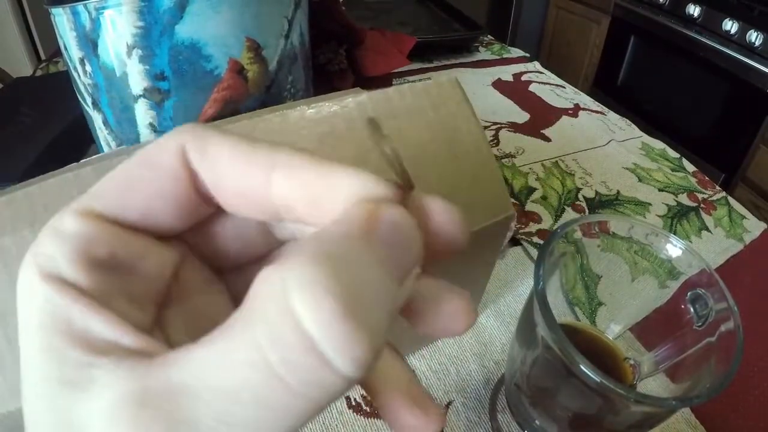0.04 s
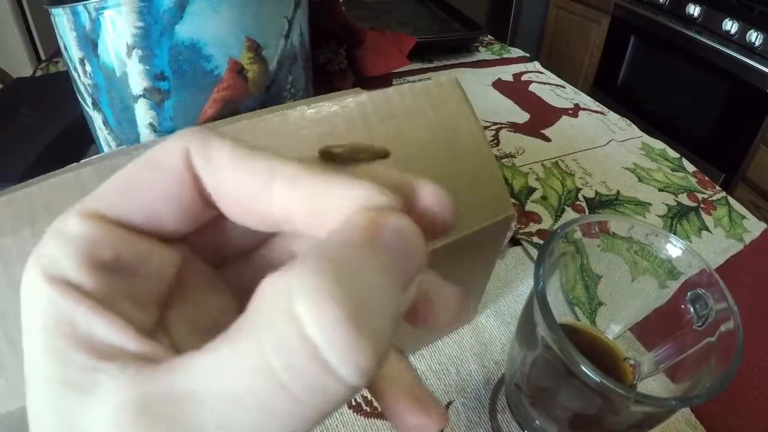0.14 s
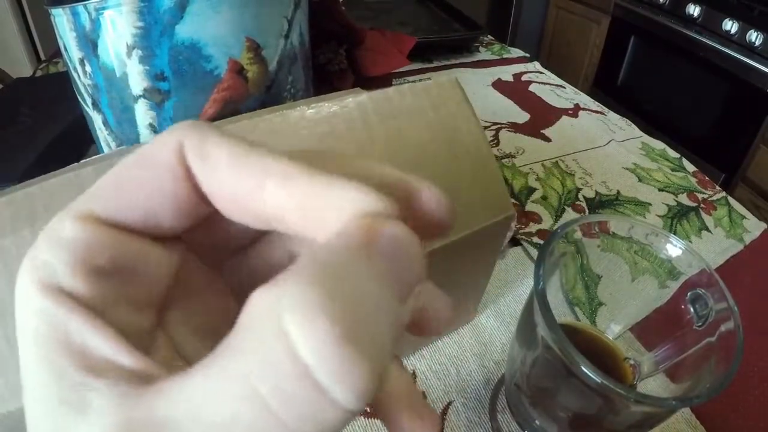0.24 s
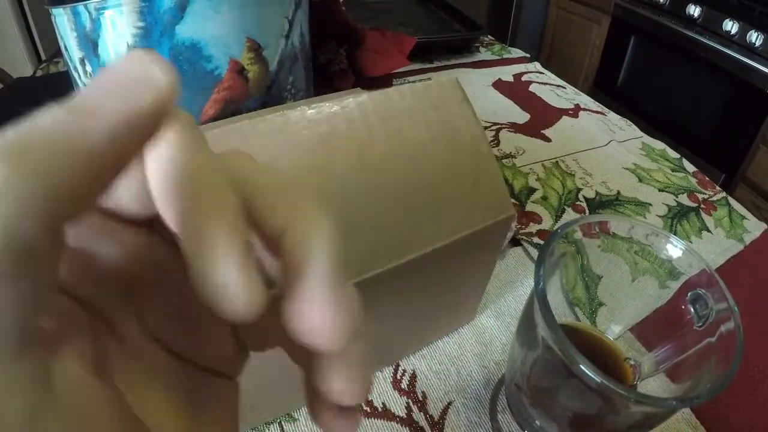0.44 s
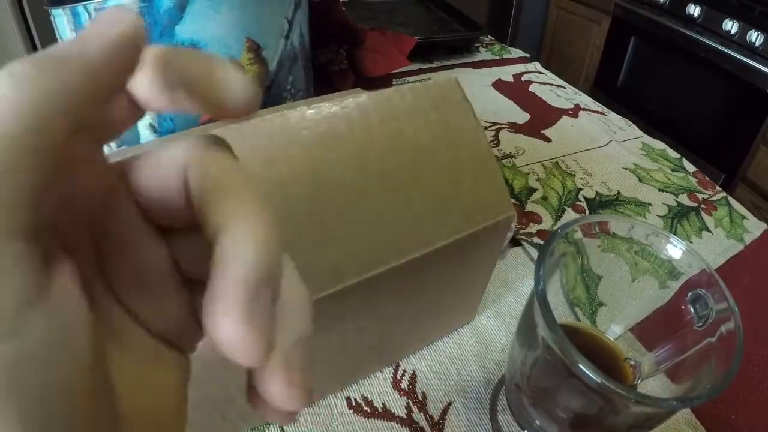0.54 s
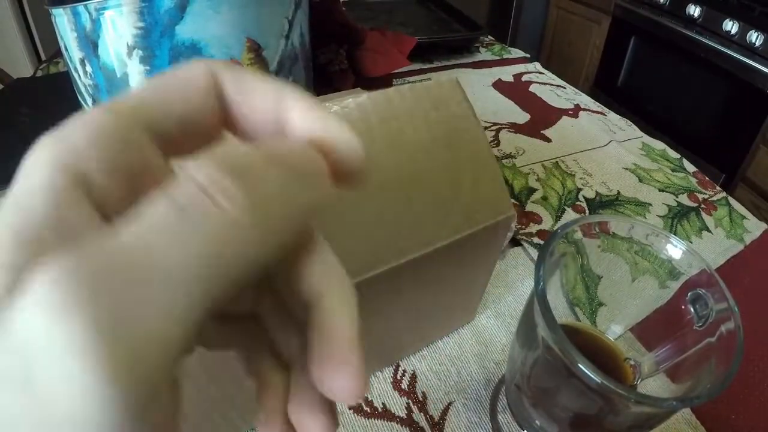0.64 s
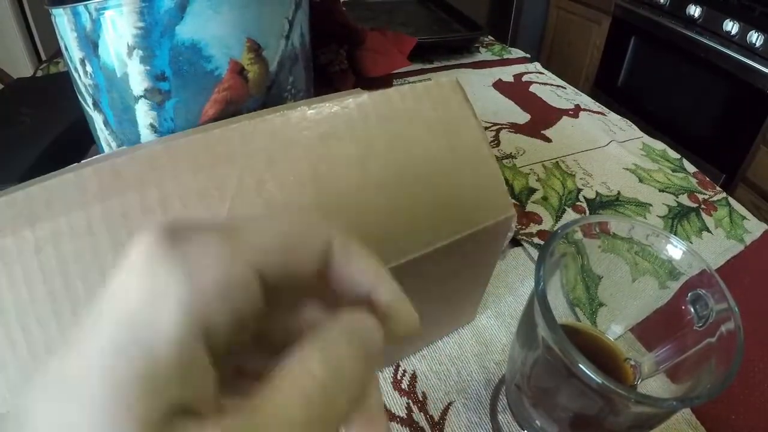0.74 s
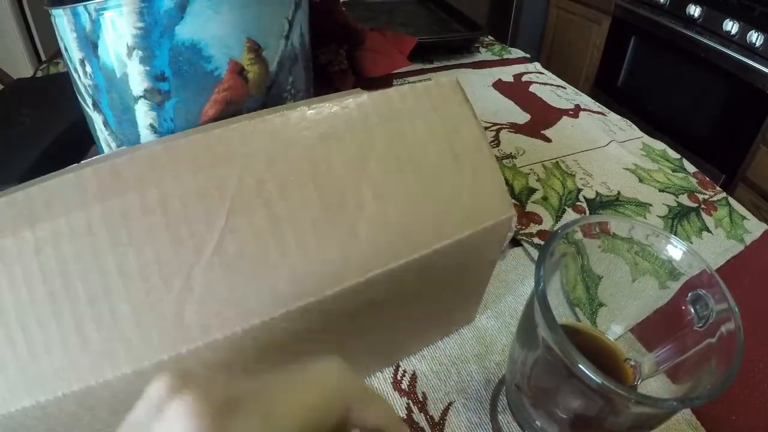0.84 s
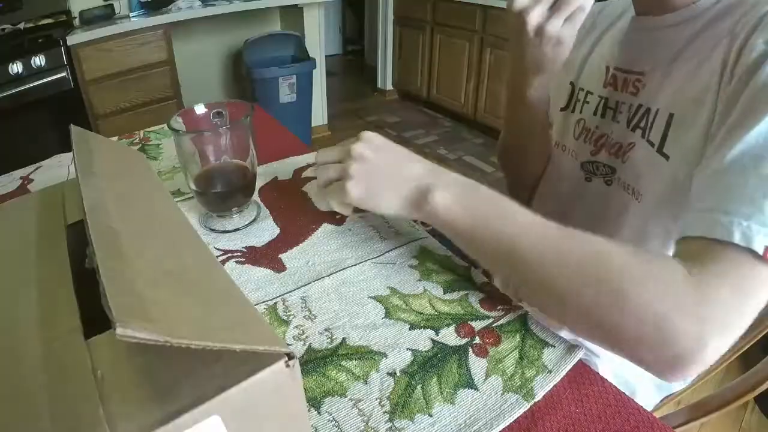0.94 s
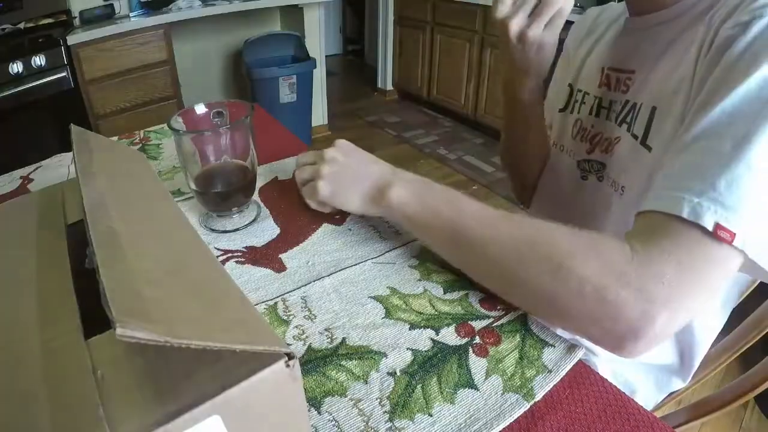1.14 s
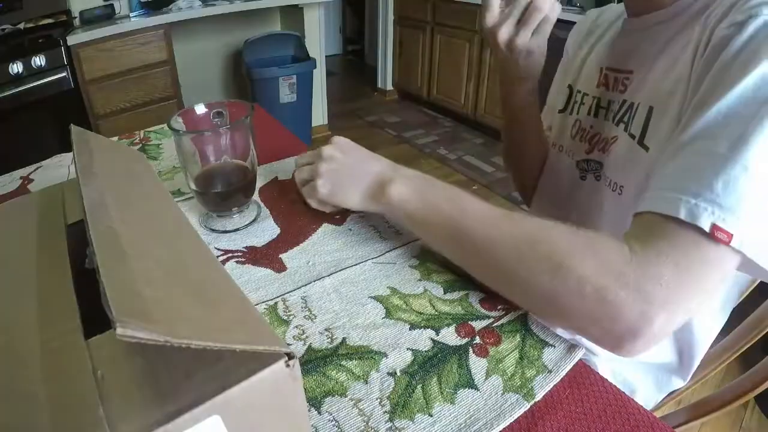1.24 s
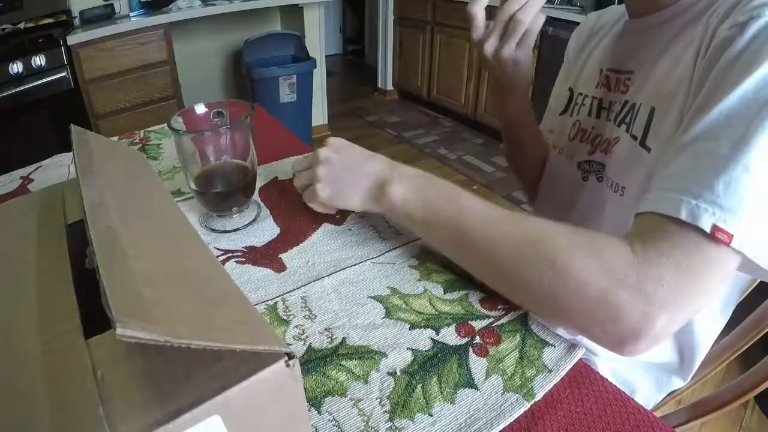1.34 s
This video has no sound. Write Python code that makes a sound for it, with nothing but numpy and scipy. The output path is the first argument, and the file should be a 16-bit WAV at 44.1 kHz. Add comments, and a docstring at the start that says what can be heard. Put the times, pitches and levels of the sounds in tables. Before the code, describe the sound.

A single sharp finger snap cracks close to the microphone at about 0.25 seconds, with a short kitchen echo. From 0.35 to 0.75 seconds the microphone is jostled, giving low booming bumps. A coin ticks further off near 0.5 seconds and clinks faintly around 0.75. At 0.8 seconds the sound drops out under a short low buzz, and quieter room tone returns just before 1 second.

```python
"""A finger snap flicks a coin away in a kitchen, close to a camera's stereo microphone: the fingers
slip, crack and thump the palm, and the room answers. Further off the coin ticks, then clinks faintly.
The camera is jostled and its housing booms, opposite in the two channels.
The sound then drops out with a short low buzz and returns as quieter room tone."""
import sys
import numpy as np
from scipy import signal
from scipy.fft import rfft, irfft, next_fast_len
from scipy.io import wavfile

SR = 44100
rng = np.random.default_rng(int(sys.argv[2]) if len(sys.argv) > 2 else 0)


def file_out(sig):
    """Save sig as 16-bit WAV at sys.argv[1]."""
    # one column per channel
    cols = np.atleast_2d(sig).T
    # limit, then scale
    lim = np.clip(cols, -1, 1)
    pcm = np.round(lim * 32767).astype(np.int16)
    wavfile.write(sys.argv[1], SR, pcm)


N = 61739

# Room tone before and after the dropout. Each row: frequency in Hz, relative level in dB.
TONE_BEFORE = [(47, -29.5), (85, -0.5), (380, -14), (731, -23.5), (1350, -25.5), (5130, -37.5),
               (6820, -33.5), (12000, -41), (15000, -57.5)]
TONE_AFTER = [(15, -29), (25, -2.5), (88, -3.5), (243, -15), (383, -22.5), (1600, -35.5), (3450, -50.5),
              (5600, -47.5), (7300, -50.5), (9000, -47.5), (12000, -58.5)]
# Stereo image of room tone and reverberation. Each row: frequency in Hz, left-right correlation.
TONE_LIKENESS = [(50, 1), (300, 0.99), (1500, 0.12)]
REVERB_LIKENESS = [(120, 0.15), (280, 0.53), (1200, 0.15), (6000, 0.61)]
# The kitchen's decay. Each row: frequency in Hz, time to fall 60 dB in seconds.
REVERB_T60 = [(200, 0.57), (1200, 0.45), (6000, 0.29)]
# The kitchen's answer to snap and coin. Each row: frequency in Hz, relative level in dB.
SNAP_REVERB = [(53, -48.5), (90, -12), (226, -5), (362, -13.5), (520, -9), (800, -16), (1390, -18),
               (1960, -33.5), (2820, -26), (3570, -39), (5720, -32.5), (10200, -52), (15000, -99)]
TICK_REVERB = [(1400, 7.5), (3000, -17), (6300, 1.5), (9000, -18), (15000, -25)]
# Outline of the buzz's harmonics. Each row: frequency in Hz, relative level in dB.
BUZZ_SPECTRUM = [(120, 5.5), (240, 0.5), (480, -17), (700, -31.5), (1500, -32.5), (3550, -64), (3820, -42),
                 (4000, -41), (4250, -71), (6650, -44), (7200, -65)]
# Rumble of movement. Each row: time in seconds, level in dB.
RUMBLE_LEVELS = [(0.0, -49.5), (0.706, -36), (0.86, -40.5)]
# Handling noises at the microphone. Each row: frequency in Hz, relative level in dB.
RUMBLE_SPECTRUM = [(15, -3), (35, 5.5), (70, 0), (400, -60)]
GRIP_SPECTRUM = [(250, -32), (800, 2.5), (2000, -19.5), (12000, -48)]
BRUSH_SPECTRUM = [(530, -48), (900, 0), (2650, -8.5), (6270, -4.5), (14000, -34)]
SCUFF_SPECTRUM = [(320, -23), (500, 18), (740, 3.5), (1400, -42)]
SCRAPE_SPECTRUM = [(900, 0), (1150, 6), (1550, -10.5), (2100, -8), (3200, -36), (14000, -49)]
# Bumps on the camera. Each row: start in seconds, boom, knock, scuff and scrape in dB, contact in seconds.
CAMERA_BUMPS = [(0.347, -4, -10, -21.5, -38.5, 0.01384), (0.434, -16.5, -29.5, -27, -37, 0.012),
                (.467, -10.5, -25, -30.5, -34.5, 0.0065), (.530, -31, -37.5, -39, -35.5, 0.0083),
                (.579, -17, -37.5, -33, -36, .012), (0.642, -53, -36, -24.5, -35.5, 0.0051),
                (.659, -15, -33.5, -24.5, -38, 0.0138), (.736, -24, -45, -33, -38, 0.0074)]
# Low and upper housing modes. Each row: frequency in Hz, gain in dB, T60 in seconds, left over right in dB.
BOOM_MODES = [(114.6, -8, 0.4, -6.5), (145.2, -4, 0.39, -4), (186.1, -3.5, 0.46, -5),
              (195.4, 0, 0.19, -4.5)]
KNOCK_MODES = [(441, -1.5, 0.3, 8.5), (457.2, -0.5, 0.12, 10), (508, -5, 0.31, 4), (676, 18.5, 0.017, 1.5),
               (744, -8, 0.14, 3)]
# The coin's ring on landing. Each row: frequency in Hz, level in dB, T60 in seconds.
TICK_MODES = [(870, -31.5, 0.015), (4860, -36, 0.017), (5770, -25.5, 0.0053), (6290, -15, 0.0043)]
# Clinks after the landing. Each row: start in seconds, gain in dB.
CLINK_HITS = [(.7405, -46.5), (.812, -48.5)]
# Their rough resonances. Each row: centre in Hz, width in Hz, gain in dB.
CLINK_BANDS = [(3066, 170, -2), (6530, 420, -6.5)]
# Fingertip slips before the snap. Each row: start in seconds, level in dB, length in seconds.
FINGER_SLIPS = [(0.2145, -37.5, .0115), (0.2275, -25, 0.015)]
# The crack's three contacts. Each row: lag in seconds, gain in dB, left over right in dB.
CRACK_CONTACTS = [(0, 2, 2.5), (.00095, -9.5, 0.5), (.0017, -15, -15.5)]
# Sliding skin, finger crack and hollow of the palm. Each row: frequency in Hz, relative level in dB.
SLIP_SPECTRUM = [(100, -20.5), (400, -0.5), (750, -7), (1150, 6), (2000, -16.5), (3200, -30.5), (5500, -24),
                 (14000, -49)]
CRACK_SPECTRUM = [(300, -21), (880, -14), (1080, -1), (1380, -0.5), (1600, -1.5), (1900, -19), (2450, -24),
                  (3050, -11.5), (3700, -27.5), (4600, -19), (6000, -20), (7200, -25), (8500, -43),
                  (15000, -44.5)]
PALM_SPECTRUM = [(50, -33.5), (170, -9.5), (250, 1), (420, -5), (620, -14), (800, -18.5), (3000, -67.5)]


def amp(db):
    """Decibels to gain."""
    return 10 ** (np.asarray(db) / 20)


def unit(x):
    """Scale to rms 1."""
    return x / np.sqrt(np.mean(x ** 2) + 1e-20)


def along(points, hz):
    """Read (Hz, value) points on a log frequency axis."""
    freqs, values = np.transpose(points)
    return np.interp(np.log(hz + 1), np.log(freqs + 1), values)


def since(s):
    """Seconds since s, zero before."""
    return np.maximum(np.arange(N) / SR - s, 0)


def strike(s, rise, t60):
    """An envelope that rises at s and falls 60 dB every t60 seconds."""
    t = since(s)
    return (1 - np.exp(-t / rise)) * amp(-60 * t / t60)


def filtered(x, response):
    """x through a frequency response."""
    size = next_fast_len(N + SR // 2)
    return irfft(rfft(x, size) * response(np.fft.rfftfreq(size, 1 / SR)), size)[..., :N]


def delayed(x, s):
    """x arriving s seconds later."""
    return filtered(x, lambda hz: np.exp(-2j * np.pi * hz * s))


def noise(spectrum, likeness):
    """Shaped stereo noise of rms 1; likeness gives the left-right correlation by frequency."""
    def mid_side(hz):
        angle = np.arccos(np.clip(along(likeness, hz), -1, 1)) / 2
        return amp(along(spectrum, hz)) * [np.cos(angle), np.sin(angle)]
    mid, side = filtered(rng.standard_normal((2, N)), mid_side)
    return unit(np.array([mid + side, mid - side]))


def band(centre_hz, width_hz):
    """A narrow band of stereo noise of rms 1."""
    white = rng.standard_normal((2, N))
    return unit(filtered(white, lambda hz: np.exp(-((hz - centre_hz) / width_hz) ** 2)))


def ring(modes, s, rise):
    """Damped modes struck at s."""
    return sum(amp(db) * strike(s, rise, t60) * np.sin(2 * np.pi * hz * since(s))
               for hz, db, t60 in modes)


def click(spectrum, s):
    """One impulse at s, ringing out through a minimum-phase filter."""
    size = next_fast_len(2 * N)
    cepstrum = irfft(np.log(amp(along(spectrum, np.fft.rfftfreq(size, 1 / SR)))), size)
    cepstrum[1:size // 2] *= 2
    cepstrum[size // 2 + 1:] = 0
    response = irfft(np.exp(rfft(cepstrum)), size)
    return np.pad(response, (round(s * SR), 0))[:N]


def room_tone():
    """The kitchen's steady background, with a faint, thin band of hiss."""
    return amp(-47) * noise(TONE_BEFORE, TONE_LIKENESS) + amp(-70.5) * band(6830, width_hz=130)


def returning_tone(start_s=0.95, swell_db_per_s=12.5):
    """Quieter room tone comes in after the dropout and slowly swells."""
    t = since(start_s)
    onset = 1 - np.exp(-t / 0.0033)
    return amp(-51 + swell_db_per_s * t) * onset * noise(TONE_AFTER, TONE_LIKENESS)


def reverb(s, spectrum, rise_s=0.0024):
    """The kitchen answers a click at s; the treble dies first."""
    hz, t, frames = signal.stft(noise(spectrum, REVERB_LIKENESS), SR, nperseg=256)
    decay = amp(-60 * np.maximum(t - s, 0) / along(REVERB_T60, hz)[:, None])
    tail = signal.istft(frames * decay, SR)[1][:, :N]
    return tail * (1 - np.exp(-since(s) / rise_s))


def buzz(start_s=0.824, end_s=0.93, pitch_hz=122.5):
    """A short train of pulses, heard as a low buzz with a thin ring that dies into the dropout."""
    hz = pitch_hz * np.arange(1, 61)
    phases = rng.normal(0, 0.82, (len(hz), 1))
    harmonics = np.sin(2 * np.pi * hz[:, None] * since(start_s) + phases)
    pulses = amp(along(BUZZ_SPECTRUM, hz)) @ harmonics
    ending = np.clip((end_s - since(0)) / 0.01, 0, 1)
    return amp(-37.5) * pulses * strike(start_s, rise=0.00096, t60=0.21) * ending


def hand():
    """Close by, the grip shifts on the coin; later the hand brushes past, over a rumble of movement."""
    grip = strike(0.122, rise=0.0012, t60=0.22) * noise(GRIP_SPECTRUM, [(800, 0.55)])
    brush = strike(0.735, rise=0.0012, t60=0.156) * noise(BRUSH_SPECTRUM, [(3000, 0.48)])
    rumble_db = np.interp(since(0), *np.transpose(RUMBLE_LEVELS))
    rumble = amp(rumble_db) * noise(RUMBLE_SPECTRUM, [(40, 0.27)])
    return amp(-46.5) * grip + amp(-52.5) * brush + rumble


def housing(modes, s, rise):
    """The housing's modes push the two microphones in opposite directions."""
    out = np.zeros((2, N))
    for hz, db, t60, pan_db in modes:
        mode = ring([(hz, db + rng.normal(0, 1), t60)], s, rise)
        out += np.outer([amp(pan_db / 2), -amp(-pan_db / 2)], mode)
    return out


def camera_bumps():
    """Each bump scuffs and scrapes the housing and sets it ringing, the low modes more slowly."""
    scuff = noise(SCUFF_SPECTRUM, [(700, -0.88)])
    scrape = noise(SCRAPE_SPECTRUM, [(1200, -0.88), (3000, 0.3)])
    out = np.zeros((2, N))
    for s, boom_db, knock_db, scuff_db, scrape_db, contact_s in CAMERA_BUMPS:
        out += amp(boom_db) * housing(BOOM_MODES, s + contact_s / 2, rise=contact_s)
        out += amp(knock_db) * housing(KNOCK_MODES, s, rise=contact_s / 2)
        friction = amp(scuff_db) * scuff + amp(scrape_db) * scrape
        out += friction * strike(s, rise=contact_s / 2, t60=0.11)
    return out


def coin(landing_s=0.5286, left_lag_s=0.00004):
    """Further off and to one side, the coin lands with a bright tick; faint clinks follow."""
    splash = noise([(3500, -28), (6000, -2.5), (14000, -12)], [(6000, 0.56)])
    crack = amp(-39) * splash * strike(landing_s, rise=0.0001, t60=0.008)
    tick = ring(TICK_MODES, landing_s, rise=0.00031)
    stereo_tick = np.array([delayed(tick, left_lag_s), tick])
    metal = sum(amp(db) * band(hz, width_hz) for hz, width_hz, db in CLINK_BANDS)
    clinks = metal * sum(amp(db) * strike(s, rise=0.0012, t60=0.063) for s, db in CLINK_HITS)
    return stereo_tick + crack + amp(-47) * reverb(landing_s, TICK_REVERB) + clinks


def finger_snap(snap_s=0.2408, palm_lag_s=0.0022, echo_lag_s=0.0128, dull_hz=4200):
    """Close to the microphone the fingers slip, crack and hit the palm; an echo and the room follow."""
    slips = sum(amp(db) * strike(s, rise=0.0023, t60=0.1) * (since(s) < length)
                for s, db, length in FINGER_SLIPS)
    splash = noise([(1200, -4.0), (2200, -15.0), (6000, -3.5), (9000, -26)], [(1000, 0.7)])
    crack = amp(-19) * splash * strike(snap_s, rise=0.0002, t60=0.012)
    for lag, db, pan_db in CRACK_CONTACTS:
        balance = amp([[pan_db / 2], [-pan_db / 2]])
        crack += balance * amp(23 + db) * click(CRACK_SPECTRUM, snap_s + lag)
    palm = amp(35.5) * click(PALM_SPECTRUM, snap_s + palm_lag_s)
    direct = slips * noise(SLIP_SPECTRUM, [(1000, 1.0)]) + crack + palm
    # A nearby surface throws the snap back, dulling the crack and scattering its treble.
    dull_crack = filtered(crack, lambda hz: 1 / (1 + 1j * hz / dull_hz) ** 2)
    echo = delayed(amp(-10) * dull_crack + amp(-3) * palm, echo_lag_s)
    scatter = amp(-19.5) * splash * strike(snap_s + echo_lag_s, rise=0.00042, t60=0.012)
    return direct + echo + scatter + amp(-21) * reverb(snap_s + palm_lag_s, SNAP_REVERB)


def scene(dropout_s=0.778, fade_db_per_s=211):
    """The flick and its aftermath drop out under a buzz; quieter room tone returns."""
    flick = finger_snap() + coin() + camera_bumps() + hand() + room_tone()
    dropout = amp(-fade_db_per_s * since(dropout_s))
    return flick * dropout + returning_tone() + buzz()


def record(dry, soft_hz=13000, limit_hz=15500):
    """The camera softens the top octave and keeps nothing above its band limit."""
    return filtered(dry, lambda hz: (hz < limit_hz) / np.sqrt(1 + (hz / soft_hz) ** 10))


dry = scene()
out = record(dry)
file_out(out)
```